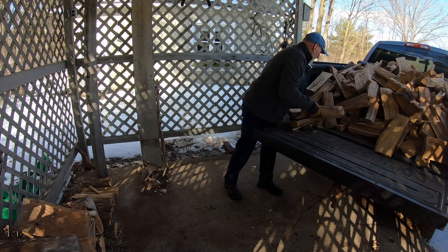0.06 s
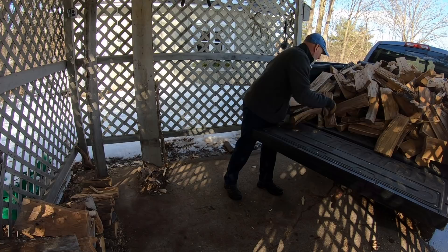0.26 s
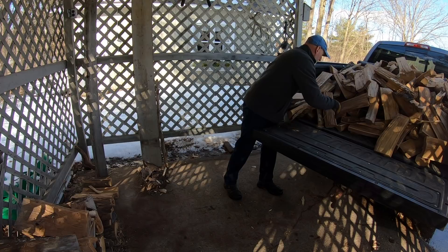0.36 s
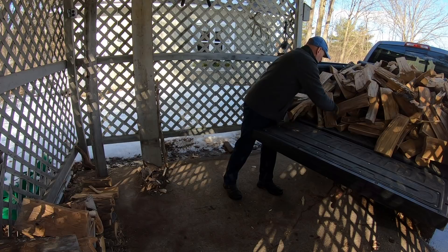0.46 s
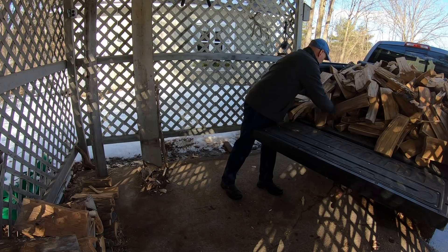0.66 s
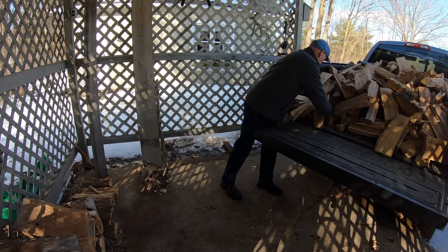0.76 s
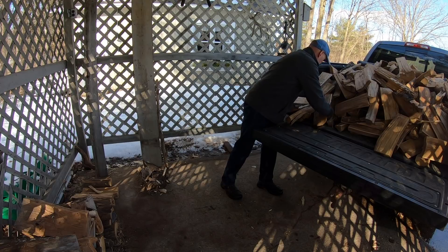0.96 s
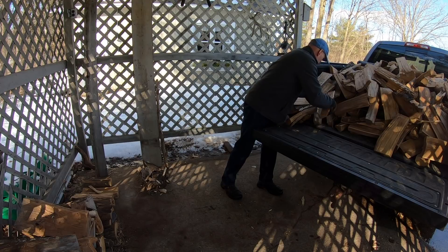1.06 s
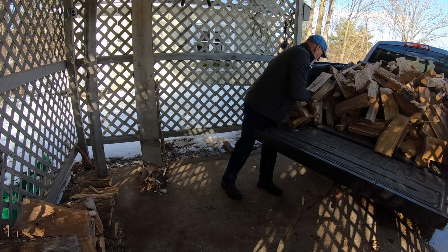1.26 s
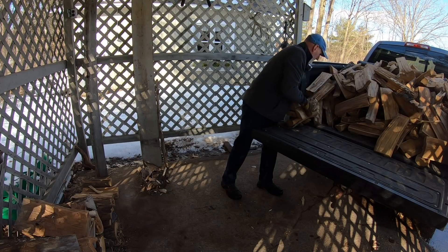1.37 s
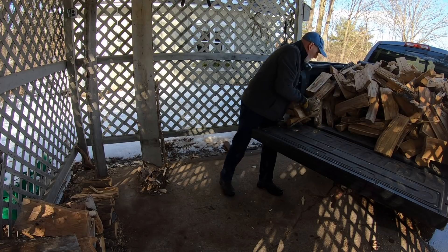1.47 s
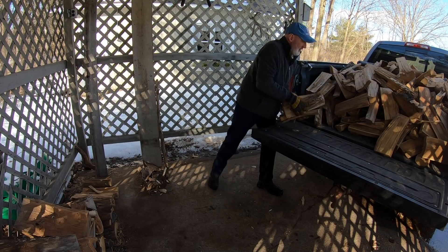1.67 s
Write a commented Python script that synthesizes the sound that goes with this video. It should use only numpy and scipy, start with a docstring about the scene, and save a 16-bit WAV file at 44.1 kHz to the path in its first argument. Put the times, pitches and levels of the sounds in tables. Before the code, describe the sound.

Firewood clunks hard as logs are pulled from a pile, scraping and knocking in an open shed

```python
"""Split firewood pulled from a pickup load under an open shed roof: pieces knock and rebound on each other.
Each knock is a damped low thud, a noise crack, a noise clunk and ringing modes.
Blows reaching the truck bed excite panel modes and a wash; dragging is grains of friction, plus snaps.
A short shed tail, a low rumble and an outdoor floor lie behind.
The hardest knocks overload the nearly mono microphone."""
import sys
import numpy as np
from scipy import signal
from scipy.fft import rfft, irfft, next_fast_len
from scipy.io import wavfile
from scipy.ndimage import uniform_filter1d, map_coordinates

SR = 44100
rng = np.random.default_rng(int(sys.argv[2]) if len(sys.argv) > 2 else 0)


def file_out(sig):
    """Save sig as 16-bit WAV at sys.argv[1]."""
    # one column per channel
    cols = np.atleast_2d(sig).T
    # limit, then scale
    lim = np.clip(cols, -1, 1)
    pcm = np.round(lim * 32767).astype(np.int16)
    wavfile.write(sys.argv[1], SR, pcm)


N = 74970
T = np.arange(N) / SR

# knocks: t/s, thud/dB, settled thud f/Hz, crack/dB, crack roll-off f/Hz, clunk/dB,
# heavy log/dB, lighter piece, lighter piece/dB
KNOCKS = [(0.2125, -4.5, 294, -21.5, 15000, -51, -55, "thin", -14.5),
          (0.2831, 8, 474, -24, 13100, -7.5, -13, "thin", -20),
          (0.2862, -14.5, 480, -31, 8000, -8.5, -19.5, "thin", -23.5),
          (0.2950, -1.5, 496, -35.5, 7900, -12, -20.5, "thin", -38),
          (0.3001, -5.5, 316, -48, 4000, -33, -47, "thin", -38),
          (.3105, -25, 600, -44, 4000, -24, -29, "thin", -42),
          (0.3749, -33, 400, -34, 5930, -35, -57, "thin", -33),
          (0.4383, -3.5, 371, -19.5, 2820, -8.5, -21, "thin", -35.5),
          (0.744, -9.5, 417, -53.5, 4000, -35, -35.5, "stout", -23.5),
          (1.2208, -28, 511, -31.5, 5130, -59, -48, "short", -28.5),
          (1.3276, 4, 339.4, -28.5, 7130, -5.5, -37.5, "short", -32.5),
          (1.3424, 1, 508, -17.5, 8500, -16, -4, "thin", -26),
          (1.3634, -10, 400, -34, 9200, -20.5, -28, "thin", -54),
          (1.554, -64.5, 395, -50, 4990, -62, -63, "stout", -47)]
# ringing of a thin, a short and a stout piece and a heavy log: f/Hz, level/dB, t60/s
THIN_MODES = [(1390, -2, 0.091), (2132, 0.5, 0.041), (3210, -4, 0.035), (3995, -11.5, 0.044)]
SHORT_MODES = [(900, 0, .12), (1389, -1, .07), (2400, 1, .035), (2860, 3, .035)]
STOUT_MODES = [(1043, 3.5, 0.057), (1240, -6, 0.073), (3950, -20, .05)]
HEAVY_MODES = [(499, -2.5, .075), (595, -13.5, 0.064), (670, -8, 0.079), (736, 1, 0.082), (800, -8.5, .065),
               (954, -5.5, 0.057), (1150, -9.5, 0.023), (1787, -13, 0.05), (2380, -24, 0.046),
               (2760, -14, 0.044), (2984, -12.5, 0.03), (3668, -14, 0.027)]
# crack and clunk spectra: f/Hz, level/dB
CRACK_SPECTRUM = [(300, -11), (1000, 7), (2000, -5.5), (3800, 6), (5500, 1), (7500, -5.5), (10500, -9.5),
                  (15500, -20.5)]
CLUNK_SPECTRUM = [(100, -8.5), (300, 8.5), (650, -6.5), (1050, 4.5), (1400, -3.5), (2200, -10.5),
                  (3200, -31), (8000, -56)]
# blows that reach the truck bed: t/s, level/dB, brightness/(dB per octave)
BOOMS = [(0.012, -28, -18.5), (0.285, -23, -13.5), (0.4379, -10, 1), (0.445, -6, 1), (0.525, -21, -10),
         (.648, -27, -8.5), (0.758, -22, -9), (1.327, -15.5, -12), (1.365, -22, -18), (1.573, -41, -22)]
# truck bed panels: f/Hz, level/dB, t60/s
BED_MODES = [(113.45, -20, 0.4), (156.9, -9, 0.18), (193.3, -6.5, 0.31), (223.2, -0.5, 0.23),
             (252.3, -2, 0.2), (279, -2.5, 0.13), (327, 6, 0.07), (367, -4, 0.23), (434, -8.5, 0.17),
             (508, -2.5, 0.083), (692, -28.5, 0.32), (904, -8, 0.13)]
# crowded weaker bed modes: f/Hz, level/dB
BED_WASH_SPECTRUM = [(40, -50), (80, -10), (120, 5.5), (300, 6), (550, -5.5), (1000, -21), (2000, -41.5),
                     (9000, -78.5)]
# bark sliding on bark: t/s, level/dB
SLIDE_LEVEL = [(.07, -61.5), (.14, -39), (.2, -48), (.26, -49), (.43, -48.5), (.53, -45), (.555, -38),
               (.62, -58.5), (.66, -39.5), (.77, -36), (.85, -44.5), (.93, -40.5), (1.05, -57.5),
               (1.11, -49), (1.19, -38.5), (1.3, -40.5), (1.42, -53.5), (1.6, -66.5)]
# bark friction spectrum: f/Hz, level/dB
BARK_SPECTRUM = [(200, 4), (600, 11.5), (1400, 6.5), (2300, 6.5), (4000, 5.5), (7000, -3), (10000, -15.5),
                 (15500, -26.5)]
# sliding log singing at one resonance: t/s, level/dB
RASP_LEVEL = [(.62, -64), (1.0, -42.5), (1.1, -95)]
# log dragged on the bed: t/s, level/dB
DRAG_LEVEL = [(0, -41), (.42, -60.5), (.63, -44), (.69, -29.5), (.78, -24), (.86, -34.5), (.93, -29),
              (1.02, -47), (1.1, -43.5), (1.26, -39), (1.31, -32.5), (1.5, -53)]
# judder spectrum of the drag: f/Hz, level/dB
JUDDER_SPECTRUM = [(30, -40.5), (75, -14), (108, 9.5), (150, 2), (240, -1), (480, -4.5), (700, -8),
                   (12000, -66)]
# glancing scuff spectrum: f/Hz, level/dB
SCUFF_SPECTRUM = [(300, -3.5), (1400, 1), (2600, -11.5), (3400, -0.5), (5000, -5), (7200, -2),
                  (10000, -14.5), (15500, -32)]
# splinters snapping: t/s, level/dB
SNAPS = [(0.354, -36.5), (0.405, -40), (0.649, -33), (0.679, -30.5), (0.822, -36), (1.017, -35),
         (1.137, -34), (1.527, -49)]
# splinter spectrum: f/Hz, level/dB
SPLINTER_SPECTRUM = [(1000, -3.5), (5000, 2.5), (9500, -10), (15500, -21)]
# shed decay: f/Hz, t60/s
SHED_DECAY = [(100, 0.18), (500, 0.13), (6000, 0.2), (14000, 0.11)]
# low rumble: t/s, level/dB
RUMBLE_LEVEL = [(0, -40), (.6, -47.5), (1.05, -40), (1.45, -55), (1.7, -56.5)]
# rumble spectrum: f/Hz, level/dB
RUMBLE_SPECTRUM = [(25, -27.5), (70, -27), (105, 7.5), (140, -11), (195, -4.5), (600, -47)]
# outdoor floor spectrum: f/Hz, level/dB
AIR_SPECTRUM = [(150, 23), (400, -25), (1500, -33.5), (5000, -16.5), (15000, -45.5)]
# stereo width: f/Hz, side over mid/dB
WIDTH = [(2000, -56), (4500, -36.5), (7000, -18), (15000, 3)]

THUD_RISE_S, THUD_T60_S = 0.0024, 0.011
THUD_LEAD, THUD_SETTLE_S = 1.8, 0.00072  # extra pitch at onset, as a fraction of the settled f
PUSH_DB, PUSH_HZ, PUSH_T60_S = -18.5, 72, 0.06
CRACK_T60_S, CLUNK_T60_S, CLUNK_RISE_S = 0.047, 0.04, 0.0001
MODE_SCATTER_DB = 1.2
WASH_DB, WASH_T60_S, BED_RISE_S, TILT_PIVOT_HZ = -7, 0.43, 0.0014, 200
GRAINS_PER_S, GRAIN_SPREAD_DB = 5500, 3
BARK_CATCH_DB, BED_CATCH_DB, CATCH_PER_S = 2.3, 0.7, 170
PATCH_DB, PATCH_BINS, PATCH_FRAMES = 2.5, 5, 8
RASP_HZ, RASP_WIDTH_HZ = 1620, 380
SCUFF_PEAK_S, SCUFF_DB, SCUFF_RISE_S, SCUFF_FALL_S = 0.2107, -17.5, 0.0042, 0.011
SNAP_T60_S = 0.028
SHED_DB, SHED_DELAY_S = -15.5, 0.0067
AIR_DB = -65
SPREAD_S = 0.001
CLIP_TOP, CLIP_HARDNESS, TOP_HZ = 0.95, 7, 16200


def amp(db):
    """Decibels to gain."""
    return 10 ** (np.asarray(db) / 20)


def unit(x):
    """Scale to rms 1."""
    return x / np.sqrt(np.mean(x ** 2) + 1e-20)


def along(points, hz):
    """(f/Hz, value) points read on a log-frequency axis."""
    f, v = np.transpose(points)
    return np.interp(np.log(hz + 1), np.log(f + 1), v)


def level(points):
    """Gain per sample from (t/s, level/dB) points."""
    return amp(np.interp(T, *np.transpose(points)))


def filtered(x, response):
    """Multiply the spectrum of x by a response of frequency."""
    m = next_fast_len(N + SR // 4)
    return irfft(rfft(x, m) * response(np.fft.rfftfreq(m, 1 / SR)), m)[..., :N]


def coloured(x, spectrum):
    """Filter x by a spectrum, at rms 1."""
    return unit(filtered(x, lambda hz: amp(along(spectrum, hz))))


def noise(spectrum):
    """Fresh noise filtered by a spectrum, at rms 1."""
    return coloured(rng.standard_normal(N), spectrum)


def fade(t60_s):
    """Exponential decay from 1."""
    return np.exp(-np.log(1000) * T / t60_s)


def ring(modes):
    """Damped modes of alternating sign, levels scattered at every blow."""
    out = np.zeros(N)
    for k, (hz, db, t60_s) in enumerate(modes):
        gain = (-1) ** k * amp(db + MODE_SCATTER_DB * rng.standard_normal())
        out += gain * fade(t60_s) * np.sin(2 * np.pi * hz * T)
    return out


def add(track, s, sound):
    """Mix a sound into the track at time s."""
    start = max(0, round(s * SR))
    track[start:] += sound[:N - start]


def thud(hz):
    """Heavily damped cycles of a log pressed on the pile, over a low push; high bending waves arrive first."""
    lead_s = THUD_LEAD * THUD_SETTLE_S * (1 - np.exp(-T / THUD_SETTLE_S))
    cycles = np.sin(2 * np.pi * hz * (T + lead_s))
    swell = (1 - np.exp(-(T / THUD_RISE_S) ** 2)) * fade(THUD_T60_S)
    push = amp(PUSH_DB) * fade(PUSH_T60_S) * np.sin(2 * np.pi * PUSH_HZ * T)
    return swell / swell.max() * cycles + push


def knocks():
    """Wood on wood: thud, crack (duller on soft bark), dense clunk and the ring of both pieces."""
    out = np.zeros(N)
    pieces = {"thin": THIN_MODES, "short": SHORT_MODES, "stout": STOUT_MODES}
    for s, thud_db, thud_hz, crack_db, rolloff_hz, clunk_db, heavy_db, piece, piece_db in KNOCKS:
        crack = filtered(noise(CRACK_SPECTRUM), lambda hz: 1 / np.hypot(1, (hz / rolloff_hz) ** 2))
        crack = crack * fade(CRACK_T60_S)
        clunk = noise(CLUNK_SPECTRUM) * fade(CLUNK_T60_S) * (1 - np.exp(-T / CLUNK_RISE_S))
        ringing = amp(heavy_db) * ring(HEAVY_MODES) + amp(piece_db) * ring(pieces[piece])
        impact = amp(thud_db) * thud(thud_hz) + amp(crack_db) * crack + amp(clunk_db) * clunk
        add(out, s, impact + ringing)
    return out


def truck_bed():
    """Panel modes and a wash boom under the logs; blows cushioned by the pile are duller."""
    out = np.zeros(N)
    for s, db, tilt_db in BOOMS:
        def slope(hz):
            return tilt_db * np.log2(hz / TILT_PIVOT_HZ)

        panels = ring([(hz, mode_db + slope(hz), t60_s) for hz, mode_db, t60_s in BED_MODES])
        wash = noise([(hz, band_db + slope(hz)) for hz, band_db in BED_WASH_SPECTRUM])
        boom = panels + amp(WASH_DB) * wash * fade(WASH_T60_S)
        add(out, s, amp(db) * (1 - np.exp(-T / BED_RISE_S)) * boom)
    return out


def friction(spectrum, catch_db):
    """Tiny slips, stronger where fibres catch; colour shifts as the point of contact moves."""
    struck = rng.random(N) < GRAINS_PER_S / SR
    slips = struck * rng.standard_normal(N) * amp(GRAIN_SPREAD_DB * rng.standard_normal(N))
    catching = map_coordinates(rng.standard_normal(N // 50), [T * CATCH_PER_S], mode="wrap")
    z = signal.stft(slips * amp(catch_db * catching), nperseg=256)[2]
    patches = uniform_filter1d(rng.standard_normal(z.shape), PATCH_BINS, axis=0)
    patches = uniform_filter1d(patches, PATCH_FRAMES, axis=1)
    shifting = signal.istft(z * amp(PATCH_DB * unit(patches)), nperseg=256)[1][:N]
    return coloured(shifting, spectrum)


def bark_slide():
    """Bark rubs on bark by many small slips."""
    return level(SLIDE_LEVEL) * friction(BARK_SPECTRUM, BARK_CATCH_DB)


def rasp():
    """Bark friction drives one resonance of the sliding log."""
    def resonance(hz):
        return 1 / (1 + (2 * (hz - RASP_HZ) / RASP_WIDTH_HZ) ** 2)

    return level(RASP_LEVEL) * unit(filtered(friction(BARK_SPECTRUM, BARK_CATCH_DB), resonance))


def bed_drag():
    """A dragged log judders on the bed: low-pitched friction."""
    return level(DRAG_LEVEL) * friction(JUDDER_SPECTRUM, BED_CATCH_DB)


def scuff():
    """One piece glances along another: noise swelling up to the first knock, then falling."""
    decay = np.maximum((SCUFF_PEAK_S - T) / SCUFF_RISE_S, (T - SCUFF_PEAK_S) / SCUFF_FALL_S)
    return amp(SCUFF_DB) * np.exp(-decay) * noise(SCUFF_SPECTRUM)


def snaps():
    """Splinters break with short decaying noise bursts."""
    out = np.zeros(N)
    for s, db in SNAPS:
        add(out, s, amp(db) * noise(SPLINTER_SPECTRUM) * fade(SNAP_T60_S))
    return out


def shed(x):
    """Short answer of roof and concrete floor: x convolved with noise decaying per frequency."""
    hz, t, z = signal.stft(rng.standard_normal(SR // 2), SR, nperseg=256)
    decay = np.exp(-np.log(1000) * t / along(SHED_DECAY, hz)[:, None])
    tail = signal.istft(z * decay, SR, nperseg=256)[1]
    out = np.zeros(N)
    add(out, SHED_DELAY_S, signal.fftconvolve(x, tail / np.linalg.norm(tail)))
    return out


def background():
    """Low rumble of varying level over a steady outdoor noise floor."""
    return level(RUMBLE_LEVEL) * noise(RUMBLE_SPECTRUM) + amp(AIR_DB) * noise(AIR_SPECTRUM)


def scene():
    """Wood, shed and background; channels differ in phase, chiefly in the top octave."""
    wood = knocks() + truck_bed() + bark_slide() + rasp() + bed_drag() + scuff() + snaps()
    mid = wood + amp(SHED_DB) * shed(wood) + background()
    # the factor 1j puts the side in quadrature: equal magnitude in both channels
    side = filtered(mid, lambda hz: 1j * amp(along(WIDTH, hz)) * np.sin(2 * np.pi * hz * SPREAD_S))
    return np.array([mid + side, mid - side])


def record(dry):
    """The microphone flattens the highest peaks and keeps nothing above its band limit."""
    clipped = dry / (1 + np.abs(dry / CLIP_TOP) ** CLIP_HARDNESS) ** (1 / CLIP_HARDNESS)
    return filtered(clipped, lambda hz: hz < TOP_HZ)


dry = scene()
out = record(dry)
file_out(out)
```